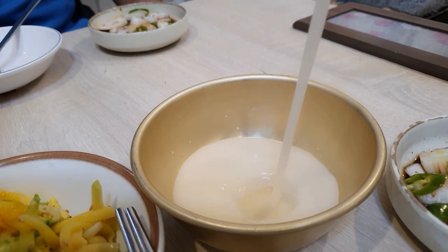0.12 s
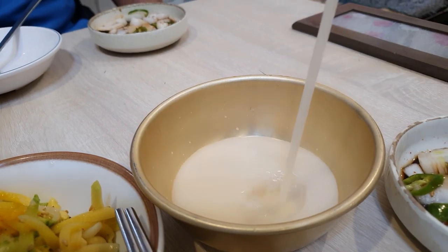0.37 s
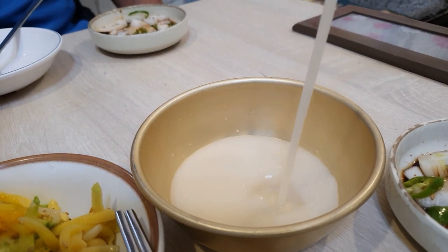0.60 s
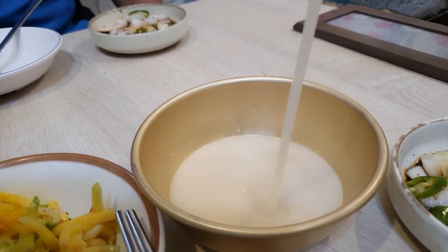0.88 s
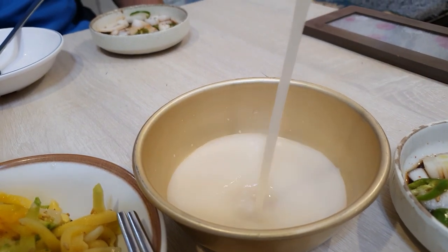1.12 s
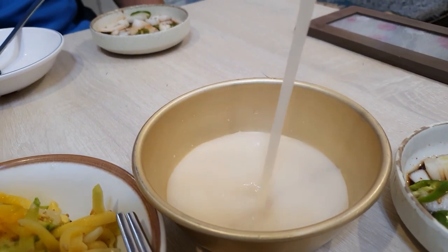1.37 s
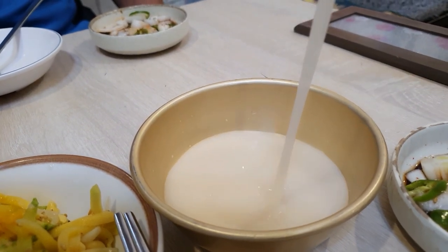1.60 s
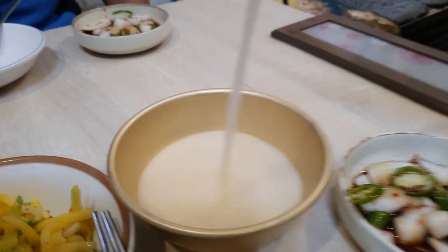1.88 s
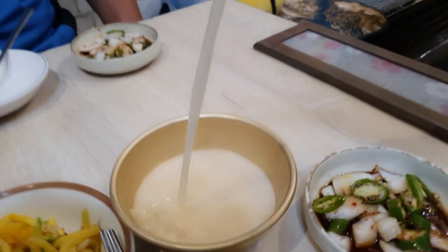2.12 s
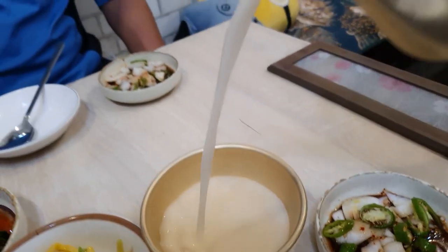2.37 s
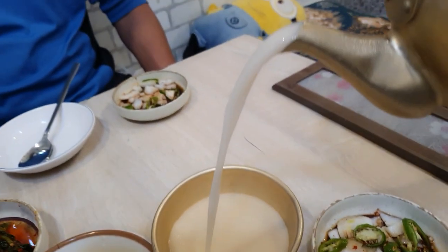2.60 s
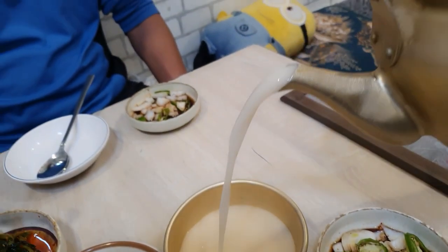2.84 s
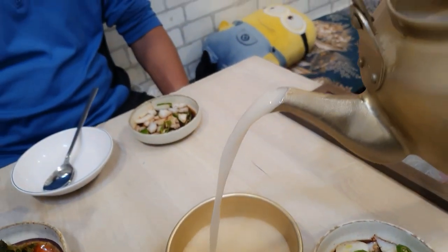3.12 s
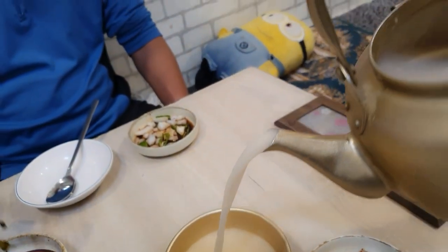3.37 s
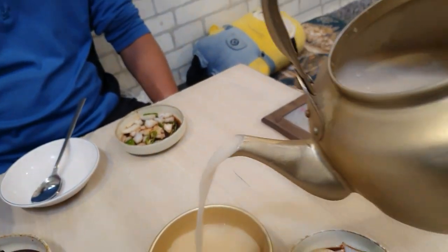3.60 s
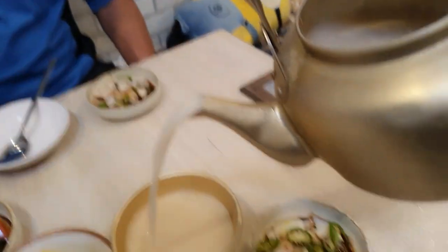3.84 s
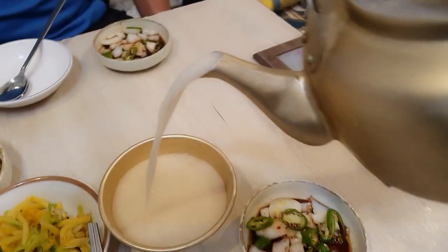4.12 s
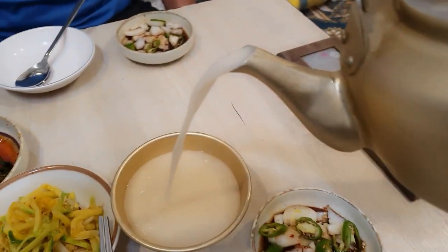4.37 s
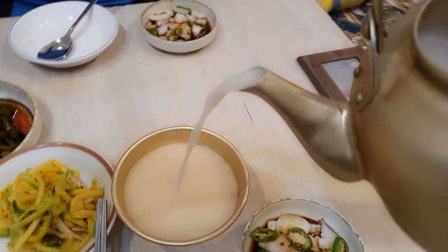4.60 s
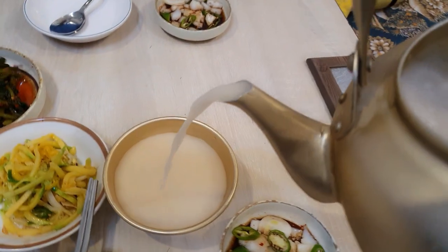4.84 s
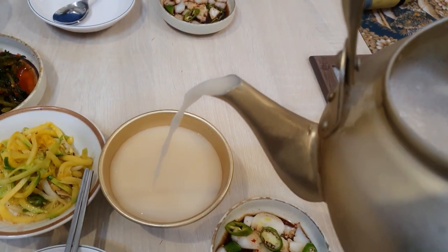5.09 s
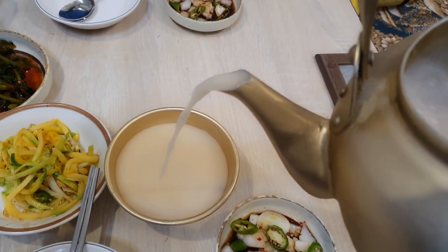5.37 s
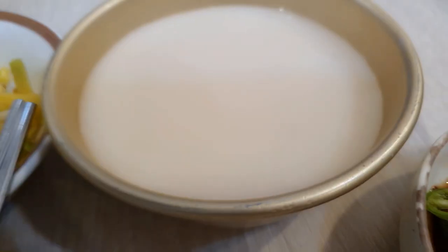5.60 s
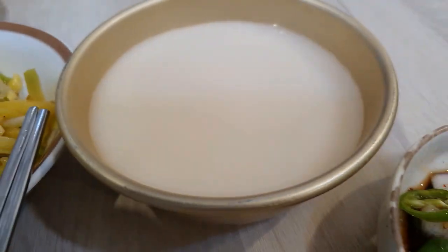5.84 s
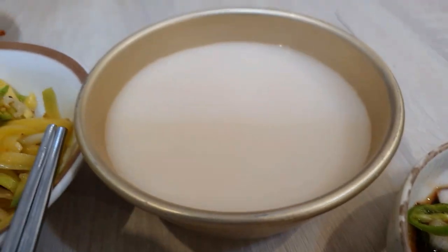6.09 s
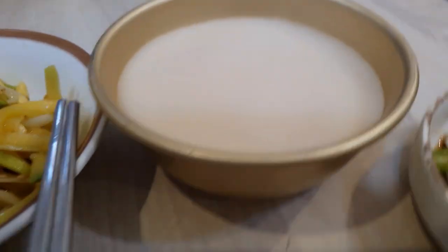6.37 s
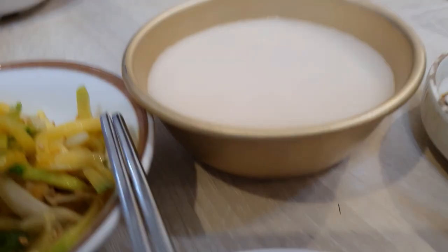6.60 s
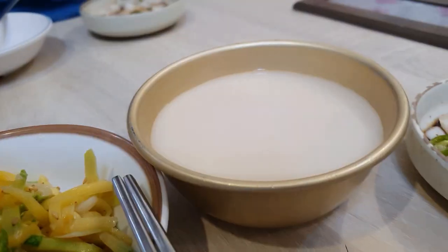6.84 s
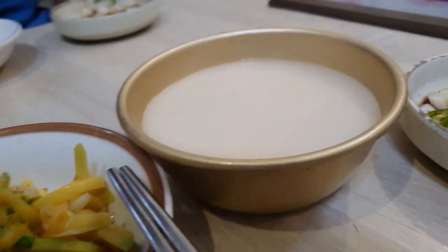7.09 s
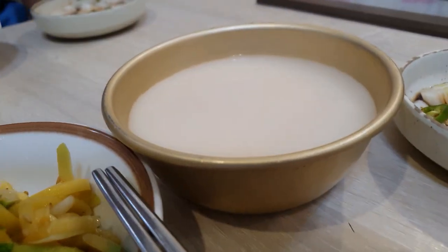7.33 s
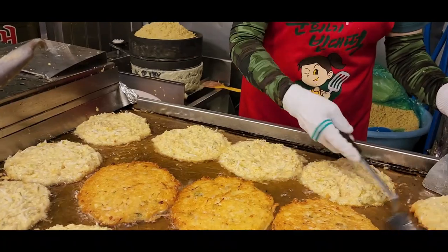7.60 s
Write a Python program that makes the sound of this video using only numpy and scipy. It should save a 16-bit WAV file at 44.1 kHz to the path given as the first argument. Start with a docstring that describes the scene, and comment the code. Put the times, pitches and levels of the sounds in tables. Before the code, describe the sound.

A close, mostly centred pour in a quiet room is already running at 0 s: liquid falls from a kettle into a thin metal bowl. For the first second, big round bubbles plop loudly and rapidly around a hollow mid-low note, over watery splashing and fine spray. From 1 to 5 s the bubbles grow smaller and softer, the hollow note climbs to about double and becomes less ringing, and a low table rumble thickens. Droplets spit sharply on metal, with tiny bell-like clinks near 3.1 to 3.7 s. The stream dies around 6 s, leaving thinning froth fizz, a few drips and ticks, a faint rustle at 6.7 s and a tick near 6.95 s. After a very short silence at 7.4 s, a market stall cuts in: steady frying hiss and low rush with a motor hum, mostly left, and one quick scraper stroke on the griddle at 7.65 s.

```python
"""At a table in a quiet room, a milky drink is poured from a kettle into a thin metal bowl close to the microphone.
Trapped bubbles and splashes ring the air left in the bowl, whose note climbs as it fills, and the bowl wall.
Droplets spit on the metal; last drips, ticks, fizzing froth and a faint rustle follow, then a short silence.
A cut leads to a market stall: a humming motor and frying, mostly at the left, and a scraper on the griddle.
Bubbles are dying sines; liquid and scraping are noise shaped by spectra, resonances and random surges."""
import sys
import numpy as np
from scipy import signal
from scipy.fft import rfft, irfft, next_fast_len
from scipy.io import wavfile
from scipy.ndimage import uniform_filter1d

SR = 44100
rng = np.random.default_rng(int(sys.argv[2]) if len(sys.argv) > 2 else 0)


def volts_from_decibels(level):
    """Turn decibel levels (scalar or array-like) into linear amplitude factors."""
    exponent = np.asarray(level, float) / 20
    return 10 ** exponent


def inscribe(sig):
    """Save sig as 16-bit PCM at rate SR to the path in sys.argv[1].

    A 1-D sig is mono; a 2-D sig holds one channel per row.
    Samples are clipped to [-1, 1] before scaling.
    """
    pcm = np.round(np.clip(np.atleast_2d(sig).T, -1, 1) * 32767)
    wavfile.write(sys.argv[1], SR, pcm.astype(np.int16))


N = 340319
T = np.arange(N) / SR  # s

# the stream under the large bubbles:
# (time [s], force [dB], break-up into spray [dB], air dragged under [dB])
STREAM = [(0, -39.5, -4, 1.5), (.27, -47.5, -4, 2.5), (.7, -41, -7.5, -1.5), (1.01, -46, -1.5, 0),
          (1.43, -44.5, -9.5, -0.8), (1.57, -46.5, 1.5, -2), (2.2, -45.5, -1, 1.5), (3.04, -45, -2, 4),
          (3.44, -45, 1, -2.5), (3.75, -39.5, -5, -4.5), (4.2, -42.5, -1, 5.5), (4.55, -45, -2, -0.5),
          (4.8, -41, -1, -5.5), (4.92, -35.5, 0.3, -5), (5.12, -43.5, -4, 9), (5.3, -45, -6.5, 1),
          (5.47, -49, 2, 4.5), (5.56, -40, 0, -5), (5.72, -40.5, -6, -1.5), (5.8, -54, -1.5, 10),
          (6.01, -53, -9.5, 4), (6.07, -62.5, -4, -12.5), (6.5, -85, 2, -11.5)]
# large bubbles pinched off: (time [s], relative level [dB], starting pitch [Hz])
LARGE_BUBBLES = [(0.044, -7, 764), (0.081, -7, 690), (0.099, -2, 718), (0.113, -8, 740), (0.133, -2.5, 737),
                 (0.183, -24.5, 716), (0.241, -9.5, 699), (0.257, -2, 733), (0.282, -2.5, 758),
                 (0.32, -5, 755), (0.345, -9, 755), (0.366, -12.5, 752), (0.386, -9, 708),
                 (0.445, -10, 695), (0.486, -9.5, 776), (0.527, -8, 738), (0.547, -12, 720),
                 (0.607, -9.5, 795), (0.637, -5, 761), (0.676, -11.5, 767), (0.712, -11.5, 544),
                 (0.73, -11, 735), (0.756, -6, 740), (0.817, -9.5, 792), (0.856, -5.5, 798),
                 (0.905, -2.5, 764), (0.931, -5.5, 765), (0.974, -15, 748), (1.007, -14, 783),
                 (1.022, -8.5, 712), (1.254, -11, 820), (1.295, -19, 870), (1.336, -7, 836),
                 (1.375, -6, 798), (1.523, -16.5, 848), (1.597, -10, 848), (1.622, -15, 846),
                 (1.688, -16.5, 854), (1.708, -18, 868), (1.727, -13.5, 888), (1.742, -16, 834),
                 (1.79, -18.5, 886), (1.823, -13.5, 878), (1.893, -17, 870), (1.973, -15.5, 914),
                 (2.029, -18, 890), (2.082, -18, 862), (2.109, -19, 933), (2.155, -14.5, 786),
                 (2.196, -16, 933), (2.227, -17, 820), (2.273, -14, 956), (2.288, -15, 952),
                 (2.35, -18.5, 880), (2.532, -17.5, 937), (2.557, -17.5, 913), (2.605, -16, 990),
                 (2.618, -10, 947), (2.65, -15, 963), (2.709, -12.5, 913), (2.775, -13.5, 930),
                 (2.852, -15.5, 632), (2.91, -16, 968), (2.923, -12, 957), (2.97, -13, 960),
                 (3.019, -19.5, 980), (3.089, -15.5, 930), (3.219, -16, 977), (3.332, -19, 962),
                 (3.365, -17.5, 1037), (3.487, -14, 1087), (3.514, -13.5, 866), (3.663, -15.5, 960),
                 (3.681, -12, 980), (3.699, -6, 963), (3.921, -17, 862), (3.951, -11, 1023),
                 (3.973, -16.5, 1180), (4.016, -22, 1180), (4.145, -14.5, 1254), (4.179, -16.5, 950),
                 (4.282, -21, 1250), (4.352, -17, 1020), (4.452, -19, 1340), (4.495, -18, 1370),
                 (4.573, -23.5, 1340), (4.596, -14.5, 1306), (4.775, -19.5, 1416), (4.89, -20.5, 960),
                 (4.923, -18, 1450), (4.95, -13, 1040), (4.991, -18, 1400), (5.068, -19.5, 1030),
                 (5.089, -13, 1064), (5.147, -21, 1460), (5.194, -15, 1330), (5.357, -19.5, 1310),
                 (5.364, -19, 1450), (5.535, -30, 560), (5.591, -24.5, 965), (5.751, -22, 1030),
                 (5.862, -26.5, 1110), (5.919, -23, 1470), (5.94, -23, 1400)]
# small bubbles: (time [s], level [dB], starting pitch [Hz])
SMALL_BUBBLES = [(0.0445, -17, 2000), (0.118, -22.5, 1875), (0.384, -20, 2000), (0.5316, -23.5, 2240),
                 (0.611, -17.5, 2260), (0.6371, -14, 2080), (0.729, -23, 2110), (1.25, -17.5, 2420),
                 (1.3349, -8, 2670), (1.505, -22.5, 2330), (1.578, -26, 2300), (1.906, -23, 2520),
                 (1.959, -21.5, 2780), (2.174, -24, 2620), (2.2452, -26, 2780), (3.5321, -17.5, 2530),
                 (3.872, -23, 2860), (4.2122, -21.5, 2106), (4.616, -22, 2830), (4.893, -24, 2577),
                 (5.088, -18, 1780), (5.356, -26, 2600), (5.407, -21.5, 1770), (5.654, -37, 2900),
                 (5.713, -30.5, 2620), (5.9443, -22, 1880), (5.986, -24.5, 1980)]
# droplets spitting on the metal: (time [s], relative level [dB], treble note [Hz])
SPITS = [(0.037, -20.5, 8070), (0.3174, -27, 7330), (0.411, -31, 6500), (0.933, -26.5, 8210),
         (1.336, -27, 9900), (1.376, -30, 5640), (1.623, -25, 5420), (1.6637, -32.5, 5400),
         (2.246, -24, 8500), (2.4976, -22, 5480), (2.6205, -22.5, 7200), (2.672, -26.5, 9720),
         (2.799, -25.5, 7900), (3.133, -18, 5630), (3.408, -28.5, 6830), (3.549, -13, 6350),
         (3.9058, -22.5, 6850), (4.228, -18, 5530), (4.322, -16.5, 7740), (4.4524, -24, 7220),
         (4.9898, -29, 8700), (5.0684, -21, 7540), (5.147, -26.5, 9200), (5.302, -21, 7400),
         (5.404, -14.5, 9700)]
# drops that strike the wall and ring its bell note: (time [s], level [dB], note [Hz])
CLINKS = [(3.133, -18, 4700), (3.466, -23.5, 4670), (3.684, -13.5, 4630)]
# last drips and small ticks at the table: (time [s], level [dB], note [Hz], relative click level [dB])
TICKS = [(6.048, -34, 1550, -30), (6.1118, -41.5, 1600, -33.5), (6.137, -41, 1650, -35),
         (6.2001, -41.5, 3030, -51.5), (6.427, -39, 3230, -45), (6.6325, -45, 1676, -61),
         (6.952, -33, 1800, -47)]
# a faint rustle: (start [s], length [s], level [dB])
RUSTLE = (6.71, .15, -64)
# spectrum of the gurgling bubbles: (frequency [Hz], relative level [dB])
GURGLE_SPECTRUM = [(200, -32), (400, -4), (600, 0.5), (1450, -0.5), (1650, -18), (2200, -12.5),
                   (5000, -55.5)]
# spectrum of the splash: (frequency [Hz], relative level [dB])
SPLASH_SPECTRUM = [(760, -27.5), (1300, 1.5), (1440, -3.5), (1640, -11), (2440, -6), (2940, -8),
                   (3420, -22), (4300, -21.5), (5590, -52), (9460, -120)]
# spectrum of the spray: (frequency [Hz], relative level [dB])
SPRAY_SPECTRUM = [(2000, -47), (3300, -3.5), (3900, -10), (4400, -1.5), (5000, -10.5), (5500, -3),
                  (6250, -6), (7300, -0.5), (8600, -5.5), (9500, -6), (10000, -8), (14300, -13),
                  (15500, -20), (15900, -46.5)]
# spectrum of the burst thrown up by a large bubble: (frequency [Hz], relative level [dB])
BURST_SPECTRUM = [(150, -42.5), (450, 7), (1200, -2), (3000, 2.5), (4000, -21), (8000, -19), (16000, -47)]
# spectrum of the quiet room: (frequency [Hz], relative level [dB])
ROOM_SPECTRUM = [(15, -59.5), (25, -27), (55, -23), (149, -18.5), (223, 2), (300, -6.5), (449, -5),
                 (487, -2.5), (814, -12), (1830, -17.5), (2530, -30), (3220, -23), (15900, -37.5)]
# spectrum of the rumbling table: (frequency [Hz], relative level [dB])
RUMBLE_SPECTRUM = [(20, -26), (60, -5), (150, 0), (210, -3), (400, -30), (SR / 2, -90)]
# wall modes, each driven best at one liquid level: (frequency at best fill [Hz], sag per fill [Hz],
# width [Hz], level [dB], best fill [0-1], fill span for -10 dB [share of a full bowl])
WALL_MODES = [(269.4, 2, 35, -45, 0.34, 0.43), (403, -1, 110, -40.5, 0.088, 0.34),
              (560, 1, 60, -39.5, 0.59, 0.1), (564, -0.5, 32, -45.5, 0.96, -0.1),
              (203, 0, 20, -49, 0.48, -0.02), (229.8, 3.5, 77, -49.5, 1, 0.5),
              (5400, 400.5, 150, -58.5, .28, 0.04), (4760, 920.5, 90, -47, 0.551, 0.23),
              (6020, 1500, 130, -53, 0.78, 0.07)]
# spectrum of the frying: (frequency [Hz], relative level [dB])
FRYING_SPECTRUM = [(20, -22), (60, -2.5), (175, -5), (400, -20), (900, -21.5), (5240, -23), (15900, -31)]
# level of the frying in each channel: (left [dB], right [dB])
FRYING_DB = (-38, -53.5)
# resonances of the scraper on the griddle: (frequency [Hz], width [Hz], relative level [dB])
SCRAPE_MODES = [(2420, 90, -9), (2920, 180, -4), (3747, 180, -24.5), (5040, 1500, -5.5), (1450, 880, -8.5)]
# tones of the motor: (frequency [Hz], left level [dB], right level [dB])
HUM = [(479, -42, -71), (717, -56, -77)]

ROOM_END, STALL_START = 7.384, 7.439  # s

FULL_S = 6.05  # the bowl fills evenly until then
FILL = np.clip(T / FULL_S, 0, 1)
AIR_START_HZ, AIR_SHRINK = 718.5, 0.535  # first note of the air in the bowl; share of that air lost
AIR_HZ = AIR_START_HZ / (1 - AIR_SHRINK * FILL)
UPPER_HZ, UPPER_CLIMB_HZ = 2000, 1180  # upper note of the air: climbs early, then levels off
DAMPED_START, DAMPED_END = 0.15, 0.96  # 0-1: a shallow air space rings less sharply

GURGLE_DB, GURGLE_FADE_DB = 19.5, 15  # over force and dragged air; fades as the air space shrinks
WASH = 0.6  # formless wash beside the separate bubbles, as a share of them
LULL_S, LULL_DB = 0.022, -5  # the gurgle drops while a large bubble gathers
SPLASH_DB = 3.5  # over the force
REFERENCE_FORCE_DB = -44
SPRAY_DB, SPRAY_FOLLOWS = -45, 0.59  # level at the reference force; dB per dB of force
MIST_DB = -7  # finest mist beside the spray, once the bowl is full
RIM_HZ, RIM_DB = 1462, -7.5  # a mode that follows the splash and grows as the level nears it
SHIFT_S = 3.13  # the stream then shifts towards the wall
CENTRED_DB, BELL_ABOVE_HZ = -15, 4000  # before it shifts, the upper-level bell notes are weaker
SPIT_SPREAD = 0.436  # stereo share of a spit
SHALLOW_SHORTENS = 0.45  # share of a large bubble's ring lost once the bowl is full
BURST_DB, BURST_GROWS_DB = -29, 9.5  # relative to its bubble; grows as the surface nears the rim
SLAP_DB = -24.5  # relative to its bubble
FOAM_HZ, FOAM_DB, FOAM_FADE_DB_PER_S = 3080, -64.5, 16  # level when the bowl is full

ROOM_DB = -59
RUMBLE_DB, RUMBLE_AFTER_DB = -65, -6.5  # base level; change once the bowl is full
RUMBLE_GROWS_S, RUMBLE_ENDS_S = 1.9, 5.7  # middles of the rise and fall of the stronger rumble
SCRAPE_S, SCRAPE_DB = 7.66, -34.5  # time and level of the peak of the stroke
SCRAPE_RISE_DB_PER_S, SCRAPE_FALL_DB_PER_S = 326.5, 120


def noise():
    """Even white noise for the whole length."""
    return rng.standard_normal(N)


def evened(x):
    """Scales to rms 1."""
    return x / np.sqrt(np.mean(x ** 2) + 1e-20)


def columns(rows):
    """Draws each column of a timed table as a curve over every sample."""
    s, *values = np.transpose(rows)
    return [np.interp(T, s, v) for v in values]


def colour(x, points):
    """Filters by a spectrum and scales to rms 1."""
    hz, db = np.transpose(points)
    size = next_fast_len(N)
    bins = np.fft.rfftfreq(size, 1 / SR)
    gain = volts_from_decibels(np.interp(np.log(bins + 1), np.log(hz + 1), db))
    return evened(irfft(rfft(x, size) * gain, size)[:N])


def resonate(x, hz, width):
    """Shifts the curve hz down to zero, smooths, and shifts back: a resonance of gain 1."""
    turn = np.exp(2j * np.pi * np.cumsum(hz * np.ones(N)) / SR)
    r = np.exp(-np.pi * width / SR)
    return 2 * (turn * signal.lfilter([1 - r], [1, -r], x / turn)).real


def bubble(hz, t60, glide, rise):
    """A dying sine that climbs with glide, as a bubble does when it nears the surface."""
    t = np.arange(round(np.clip(t60, .003, .12) * SR)) / SR
    shape = (1 - np.exp(-t / rise)) * volts_from_decibels(-60 * t / t60)
    cycles = np.minimum(hz * t * (1 + glide * t / t60), .4 * SR * t)
    return shape / shape.max() * np.sin(2 * np.pi * cycles)


def add(mix, s, sound):
    """Mixes a sound in at s seconds."""
    part = mix[round(s * SR):][:len(sound)]
    part += sound[:len(part)]


def clumps(depth_db, s):
    """A slow random factor that holds for about s seconds."""
    width = round(s * SR)
    slow = uniform_filter1d(uniform_filter1d(noise(), width), width)
    return volts_from_decibels(depth_db * evened(slow))


def patchy(x, depth_db):
    """The colour shifts in patches about 1 kHz wide and 30 ms long."""
    z = signal.stft(x, nperseg=256, noverlap=192)[2]
    patches = rng.standard_normal(z.shape)
    patches = uniform_filter1d(uniform_filter1d(patches, 6, axis=0), 20, axis=1)
    z = z * volts_from_decibels(depth_db * evened(patches))
    return evened(signal.istft(z, nperseg=256, noverlap=192)[1][:N])


def surges(per_s, t60, steady):
    """Lumps of liquid land at once and die away, over a steady part of the stream."""
    lumps = np.minimum(rng.exponential(1, N), 2) * (rng.random(N) < per_s / SR)
    fading = signal.lfilter([1], [1, -volts_from_decibels(-60 / (t60 * SR))], lumps)
    return evened(steady + uniform_filter1d(fading, 40))


def swarm(lo_hz, hi_hz, per_s, cycles, spread_db, count=24, glide=0.17):
    """Many bubbles at random times, with random pitches and sizes, a few of them large."""
    size = volts_from_decibels(spread_db * np.minimum(rng.exponential(1, N), 4)) * (rng.random(N) < per_s / SR)
    kind, out = rng.integers(0, count, N), np.zeros(N)
    for k, hz in enumerate(np.geomspace(lo_hz, hi_hz, count)):
        ring = bubble(hz, cycles / hz, glide=glide, rise=0.067 / hz) * np.sqrt(hz)
        out += signal.oaconvolve(size * (kind == k), ring)[:N]
    return evened(out)


def room():
    """Soft room noise; the table rumbles, most strongly while the stream runs into the heavier bowl."""
    rumble = colour(noise(), RUMBLE_SPECTRUM)
    hush = volts_from_decibels(ROOM_DB) * colour(noise(), ROOM_SPECTRUM) * clumps(depth_db=1.0, s=0.03)
    strong = np.clip(np.minimum(T - RUMBLE_GROWS_S, RUMBLE_ENDS_S - T) / 0.44 + .5, 0, 1)
    rumble_db = RUMBLE_DB + 6.5 * strong * (0.81 + 0.059 * T) + RUMBLE_AFTER_DB * (T > FULL_S)
    return hush + volts_from_decibels(rumble_db) * rumble * clumps(depth_db=3.0, s=0.19)


def lulls():
    """The gurgle drops just before each large bubble, which takes its air."""
    gathering = np.zeros(N)
    for s, *_ in LARGE_BUBBLES:
        add(gathering, max(s - LULL_S, 0), np.ones(round(LULL_S * SR)))
    return volts_from_decibels(LULL_DB * uniform_filter1d(np.minimum(gathering, 1), 300))


def gurgle(surge, level_db):
    """Bubbles drive the air left in the bowl, which rings higher and less sharply as it shrinks."""
    damped = np.clip(DAMPED_START + (DAMPED_END - DAMPED_START) * FILL ** 2.4, 0, 1)
    bubbles = swarm(461, 1360, per_s=350, cycles=23.6, spread_db=0.5) + WASH * noise()
    bubbles = colour(bubbles * surge ** 0.78, GURGLE_SPECTRUM)
    # lesser bubbles pinching off
    pinches = np.minimum(rng.exponential(1, N), 2) * (rng.random(N) < 170. / SR)
    pinches = colour(pinches, GURGLE_SPECTRUM)
    narrow = resonate(resonate(bubbles + 1.2 * pinches, AIR_HZ, 70.0), AIR_HZ, 330.0)
    wide = resonate(resonate(bubbles, AIR_HZ, 310.0), AIR_HZ, 980.0)
    ringing = (1 - damped) * narrow + 1.3 * damped * (1 - 0.75 * FILL ** 9) * wide
    direct = (0.038 + 0.4 * damped ** 3) * bubbles
    return volts_from_decibels(level_db) * lulls() * evened(ringing + direct)


def splash(surge, force_db):
    """Small bubbles and noise excite the upper note of the air."""
    upper_hz = UPPER_HZ + UPPER_CLIMB_HZ * np.sin(np.pi / 2 * FILL)
    small = swarm(1265, 4000, per_s=550, cycles=28, spread_db=3.0, glide=0.54) + 0.4 * noise()
    small = patchy(colour(small * surge ** 0.49, SPLASH_SPECTRUM), depth_db=3.5)
    return volts_from_decibels(force_db + SPLASH_DB) * evened(0.49 * small + resonate(small, upper_hz, 200.0))


def spray_texture():
    """Very small bubbles and noise, with a fine mist that grows with the fill."""
    drops = swarm(3500, 15500, per_s=1400, cycles=52, spread_db=3.5, count=16) + .95 * noise()
    drops = patchy(colour(drops, SPRAY_SPECTRUM), depth_db=2)
    return drops + volts_from_decibels(MIST_DB) * FILL * evened(np.diff(drops, 2, prepend=[0, 0]))


def spray(surge, force_db, breakup_db):
    """The broken stream spatters in clumps; a random gate adds some treble stereo difference."""
    level_db = SPRAY_DB + SPRAY_FOLLOWS * (force_db - REFERENCE_FORCE_DB) + breakup_db
    spatter = volts_from_decibels(level_db) * evened(surge ** 0.48 * surges(per_s=56, t60=0.035, steady=0.47))
    gate = uniform_filter1d(1. * (clumps(depth_db=1, s=.03) > volts_from_decibels(.55)), 300)
    side = volts_from_decibels(-13) * gate * spatter * spray_texture()
    return spatter * spray_texture() + np.array([side, -side])


def wall(surge, force_db):
    """The stream knocks the metal wall, whose modes shift and trade places as the liquid rises."""
    knocks = noise() * surge ** .5 * surges(per_s=35, t60=0.12, steady=0.38)
    modes = [(RIM_HZ, 60., force_db + SPLASH_DB + RIM_DB - 8 * (1 - FILL) ** 2)]
    slosh = clumps(depth_db=.025, s=.06)  # the rocking liquid bends these notes, the low ones most
    for hz, sag_hz, width, db, best, span in WALL_MODES:
        level_db = db - 10 * ((FILL - best) / span) ** 2 + .5 * (force_db - REFERENCE_FORCE_DB)
        level_db = level_db + CENTRED_DB * (T < SHIFT_S) * (hz > BELL_ABOVE_HZ) * (best > .5)
        bent_hz = (hz - sag_hz * (FILL - best)) * slosh ** (1 + 2000 / hz)
        modes.append((bent_hz, width, level_db))
    return sum(volts_from_decibels(db) * evened(resonate(resonate(knocks, hz, width), hz, 2.2 * width))
               for hz, width, db in modes)


def pour():
    """Gurgle, splash, spray and wall share the same surges of the falling stream."""
    force_db, breakup_db, dragged_db = columns(STREAM)
    surge = surges(per_s=40, t60=0.16, steady=1.5 - 1.05 * FILL)
    stream = gurgle(surge, force_db + dragged_db + GURGLE_DB - GURGLE_FADE_DB * FILL)
    stream = stream + splash(surge, force_db) + wall(surge, force_db)
    running = np.clip((6.25 - T) / 0.24, 0, 1)
    return (stream + spray(surge, force_db, breakup_db)) * running


def spits():
    """Droplets hit the metal: a treble note and a crack inside a puff of spray."""
    notes, puff, snap = np.zeros((3, N))
    t = np.arange(1800) / SR
    for s, db, hz in SPITS:
        add(notes, s, volts_from_decibels(db - 3.5) * bubble(hz, 45 / hz, glide=0.043, rise=0.00068))
        add(puff, s, volts_from_decibels(db - 19.0 - 60 * t / 0.07))
        add(snap, s, volts_from_decibels(db - 21.0 + 9.9 * np.log2(hz / 8000) - 60 * t / 0.024))
    mist, beside = (patchy(colour(noise(), SPRAY_SPECTRUM), depth_db=10.0) for _ in range(2))
    crack = evened(np.diff(mist, 2, prepend=[0, 0]))
    side = SPIT_SPREAD * (puff + snap) * beside
    return notes + puff * mist + snap * crack + np.array([side, -side])


def large_bubbles():
    """Each slaps, rings with a detuned neighbour, sets the air ringing and throws up a short burst."""
    tones, kick = np.zeros((2, N))
    t = np.arange(1500) / SR
    strays = rng.uniform(-1, 1, (len(LARGE_BUBBLES), 2))
    for (s, db, hz), (detune, late) in zip(LARGE_BUBBLES, strays):
        start = round(s * SR)
        ring = 1 - SHALLOW_SHORTENS * FILL[start] ** 2
        slap = bubble(hz * 1.2, 5 / hz, glide=0.9, rise=0.000098)
        neighbour = bubble(hz * (0.823 + 0.18 * detune), 24 / hz, glide=0.06, rise=0.002)
        air = bubble(AIR_HZ[start], 0.1 * ring, glide=0.0098, rise=0.0013)
        add(tones, s, volts_from_decibels(db) * bubble(hz, 50 / hz * ring, glide=0.03, rise=0.0007))
        add(tones, s, volts_from_decibels(db + SLAP_DB) * slap)
        add(tones, s + 0.00345 * (1 + late), volts_from_decibels(db - 8.5) * neighbour)
        add(tones, s, volts_from_decibels(db - 9.5) * air)
        add(kick, s, volts_from_decibels(db - 60 * t / 0.058))
    burst = kick * patchy(colour(noise(), BURST_SPECTRUM), depth_db=2)
    # a small bubble radiates no bass
    tones = signal.sosfilt(signal.butter(2, 230., "high", fs=SR, output="sos"), tones)
    return 0.76 * tones + volts_from_decibels(BURST_DB + BURST_GROWS_DB * FILL) * burst


def small_bubbles():
    """Single small bubbles ring, each with a short splash."""
    notes, kick = np.zeros((2, N))
    t = np.arange(1800) / SR
    for s, db, hz in SMALL_BUBBLES:
        add(notes, s, volts_from_decibels(db) * bubble(hz, 36 / hz, glide=0.18, rise=0.00023))
        add(kick, s, volts_from_decibels(db - 13 - 60 * t / 0.084))
    return notes + kick * patchy(colour(noise(), SPLASH_SPECTRUM), depth_db=10.0)


def clinks():
    """Drops strike the wall and ring its bell note at a steady pitch."""
    out = np.zeros(N)
    for s, db, hz in CLINKS:
        add(out, s, volts_from_decibels(db) * bubble(hz, 0.024, glide=0, rise=0.00038))
    return out


def foam():
    """Tiny bubbles in the froth burst and thin out as the stream stops."""
    fizz = swarm(2900, 14000, per_s=610, cycles=13, spread_db=0.5, count=12)
    fizz = evened(fizz + 3 * resonate(fizz, FOAM_HZ, 500.))
    fade = volts_from_decibels(FOAM_DB - FOAM_FADE_DB_PER_S * (T - FULL_S))
    return fade * np.clip((T - FULL_S) / .15 + 1, 0, 1) * fizz


def ticks():
    """Last drips and ticks: two short notes with a broadband click."""
    out, t = np.zeros(N), np.arange(400) / SR
    puffs = rng.standard_normal((len(TICKS), 400))
    for (s, db, hz, click_db), puff in zip(TICKS, puffs):
        click = np.diff(puff, prepend=0) + 0.39 * uniform_filter1d(puff, 5)
        add(out, s, volts_from_decibels(db) * bubble(hz, 10 / hz, glide=0.043, rise=0.000089))
        add(out, s, volts_from_decibels(db - 10.5) * bubble(1.86 * hz, 20 / hz, glide=0.032, rise=0.000205))
        add(out, s, volts_from_decibels(click_db - 2.5 - 60 * t / 0.0098) * click)
    return out


def rustle():
    """Gritty noise through two resonances, swelling in and out."""
    grit = noise() * clumps(depth_db=1.0, s=.003)
    sound = resonate(grit, 3000.0, 800.0) + 2.5 * resonate(grit, 2200.0, 350.)
    start, length, db = RUSTLE
    swell = np.clip(np.minimum(T - start, start + length - T) / 0.015, 0, 1)
    return volts_from_decibels(db) * swell * evened(sound)


def frying():
    """A steady hiss and low rush from separate noise in each channel."""
    return np.array([volts_from_decibels(db) * colour(noise(), FRYING_SPECTRUM) for db in FRYING_DB])


def motor():
    """Two slightly rough tones that waver together in level."""
    waver = clumps(depth_db=2.0, s=0.015)
    out = np.zeros((2, N))
    for hz, *db in HUM:
        cycles = np.cumsum(hz * clumps(depth_db=.15, s=.008)) / SR
        out += volts_from_decibels(db)[:, None] * np.sqrt(2) * waver * np.sin(2 * np.pi * cycles)
    return out


def scraper():
    """Grit under the sliding metal excites its resonances in one stroke at the left."""
    grit = noise() * clumps(depth_db=2.0, s=.002)
    scrape = sum(volts_from_decibels(db) * evened(resonate(grit, hz, width)) for hz, width, db in SCRAPE_MODES)
    rise_db, fall_db = SCRAPE_RISE_DB_PER_S * (T - SCRAPE_S), SCRAPE_FALL_DB_PER_S * (SCRAPE_S - T)
    stroke_db = SCRAPE_DB + np.minimum(rise_db, fall_db)
    return volts_from_decibels(stroke_db) * evened(scrape) * volts_from_decibels([[0], [-16]])  # left, right


def scene():
    """The pour at the table, mostly in the centre, a short silence, then the stall."""
    table = room() + pour() + spits() + large_bubbles() + small_bubbles() + clinks()
    table = table + foam() + ticks() + rustle()
    stall = frying() + motor() + scraper()
    return table * (T < ROOM_END) + stall * np.clip((T - STALL_START) / 0.0049, 0, 1)


def roll_off(x):
    """The treble ends steeply here."""
    return signal.sosfilt(signal.butter(12, 16010, fs=SR, output="sos"), x)


def record(dry):
    """A low cut in the microphone; peaks are clipped just under full scale."""
    cut = signal.sosfilt(signal.butter(2, 45., "high", fs=SR, output="sos"), dry)
    return roll_off(np.clip(cut, -.98, .98))


dry = scene()
out = record(dry)
inscribe(out)
```